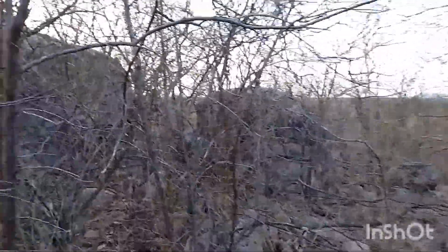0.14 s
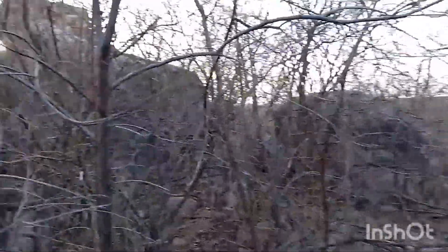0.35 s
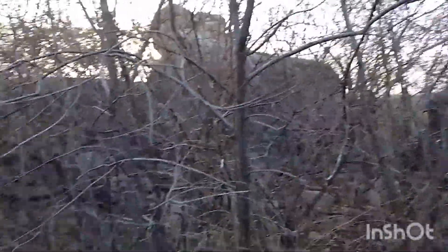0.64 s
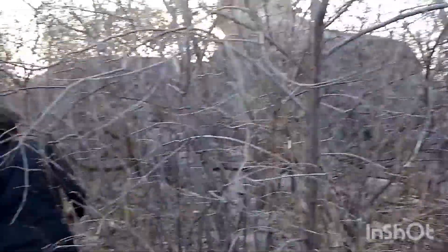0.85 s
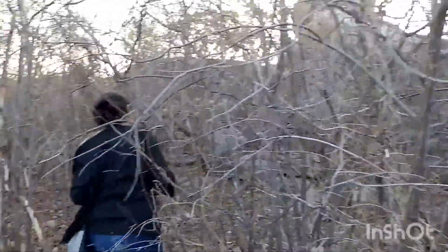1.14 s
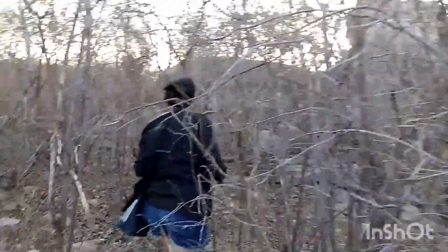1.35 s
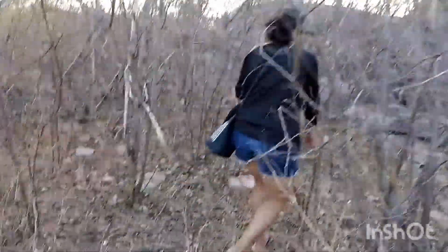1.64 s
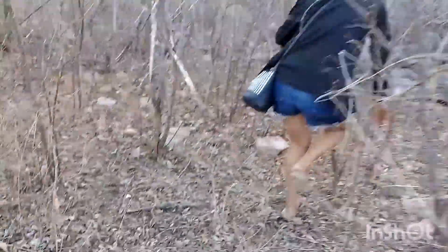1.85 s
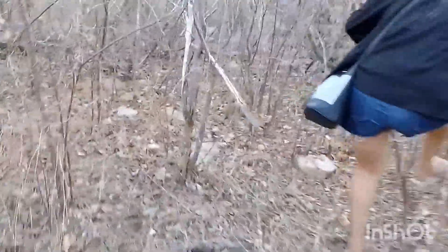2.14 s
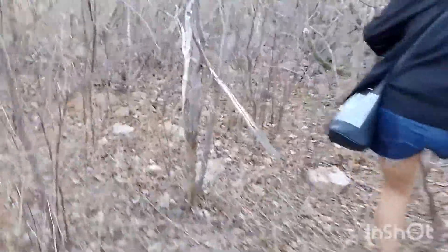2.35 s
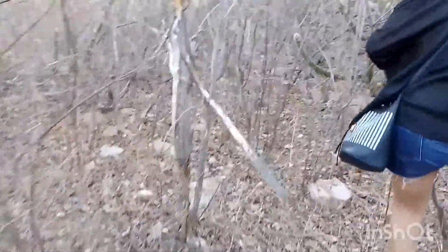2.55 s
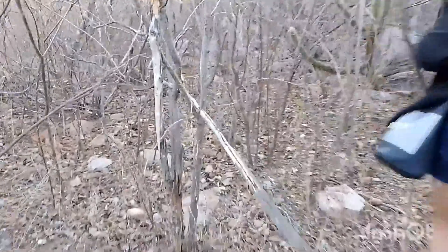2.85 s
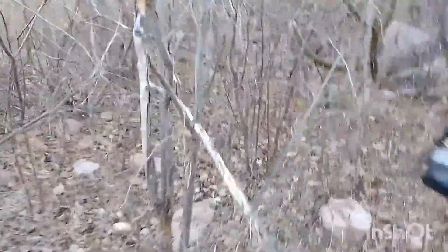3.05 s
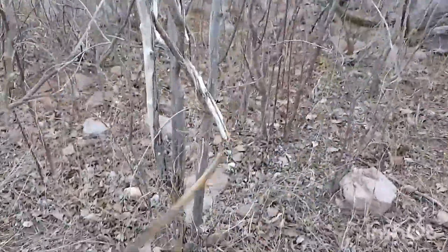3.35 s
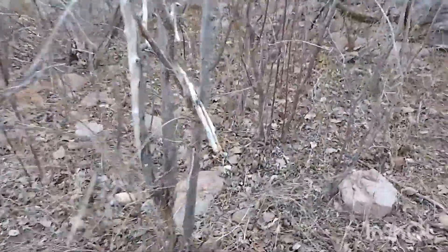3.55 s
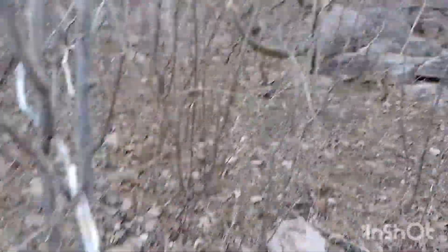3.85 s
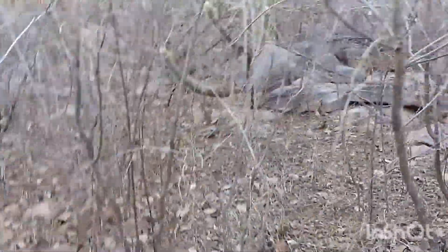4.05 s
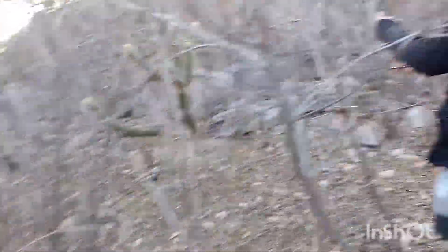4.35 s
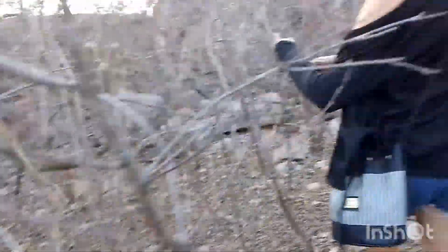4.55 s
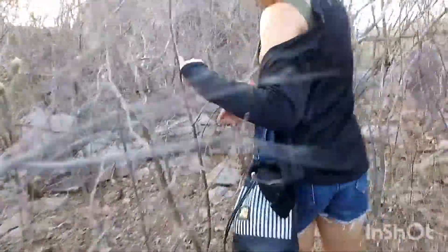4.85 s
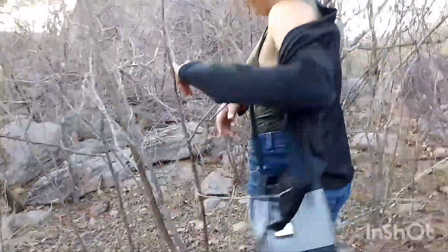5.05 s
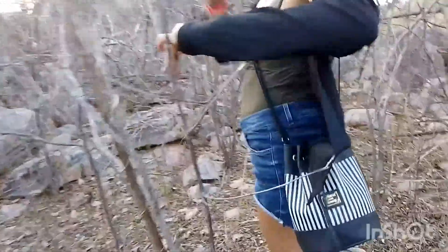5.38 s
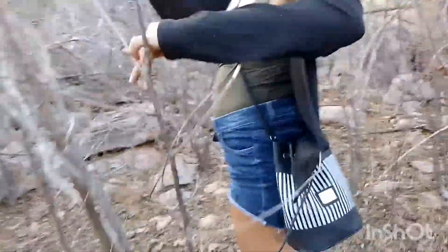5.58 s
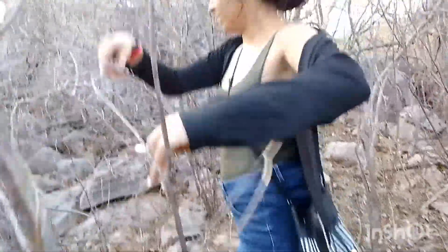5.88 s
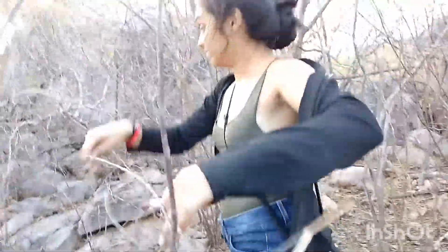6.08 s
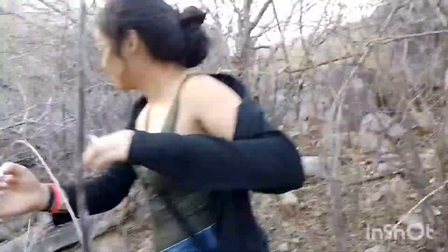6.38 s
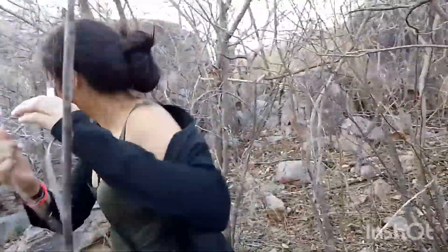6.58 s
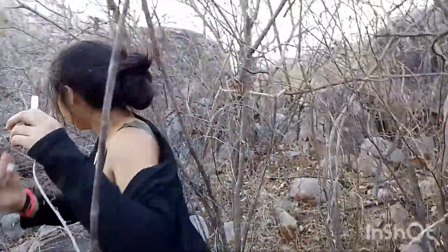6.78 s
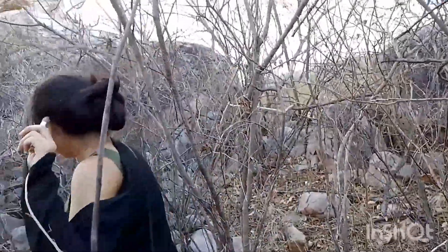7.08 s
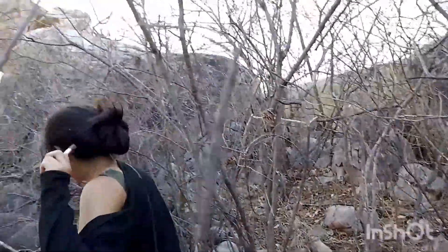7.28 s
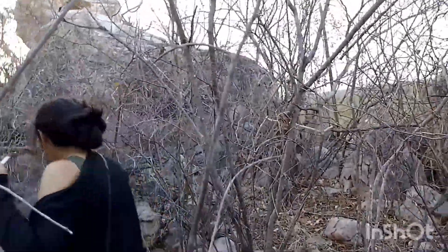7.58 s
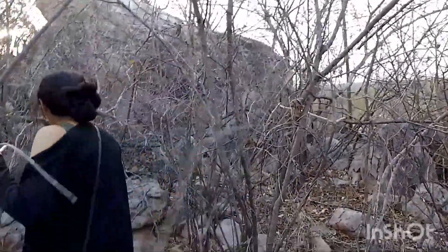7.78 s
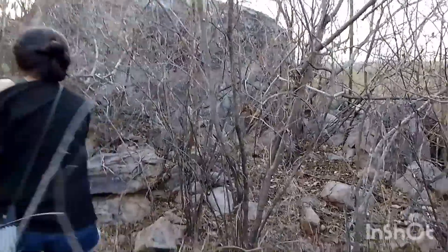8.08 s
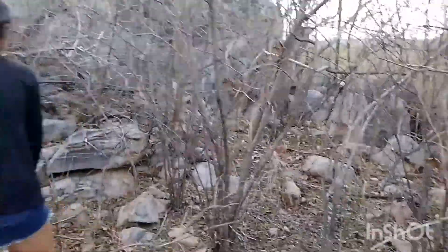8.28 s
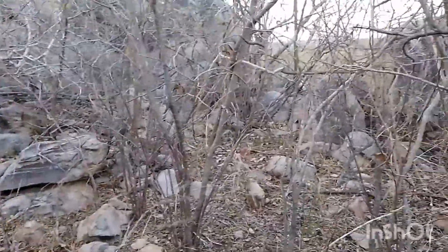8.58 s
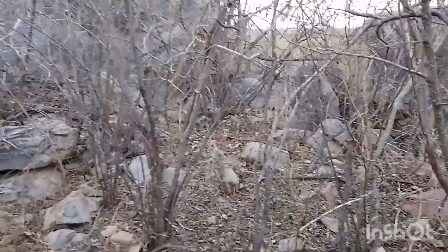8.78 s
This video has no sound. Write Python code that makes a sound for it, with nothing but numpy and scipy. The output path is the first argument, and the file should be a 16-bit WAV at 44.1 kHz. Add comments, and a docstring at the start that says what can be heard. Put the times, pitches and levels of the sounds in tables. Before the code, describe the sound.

Outdoors among bare stems and leaf litter, very close and dry, single microphone. Bright crispy rustling rises and falls with steps; thin twigs break with sharp ticks, thicker stems knock dully or rub with short airy scrapes. The strongest crack comes a little after three seconds, another dense run after five. Tiny metal jingles appear briefly in two places, and soft low handling rumble flutters under the movement.

```python
"""Walkers in dry scrub

Walkers push through leafless dry scrub, close to a handheld phone. Leaf litter and brush crackle in swells:
damped sine grains and patchy noise, coloured by layer. Twigs snap as noise bursts through resonances, stems
knock as rough damped notes and rub as noise through narrow bands; near 0.45-1.15 s a faint breath is drawn in
through the same narrow bands. Small metal pieces on a bag jingle in two short groups of decaying sines, and the
air rumbles faintly on the microphone as wavering low noise."""
import sys
import numpy as np
from scipy import signal
from scipy.fft import rfft, irfft, next_fast_len
from scipy.io import wavfile
from scipy.ndimage import uniform_filter1d, map_coordinates

SR = 44100
rng = np.random.default_rng(int(sys.argv[2]) if len(sys.argv) > 2 else 0)


def digitize_waveform(pressure):
    """Quantize a signal to 16-bit integers and store it at the path in sys.argv[1].

    Rows of a 2-D input are taken as channels; values are limited to [-1, 1].
    """
    field = np.atleast_2d(pressure).T
    bounded = np.clip(field, -1, 1)
    quanta = np.round(bounded * 32767).astype(np.int16)
    wavfile.write(sys.argv[1], SR, quanta)


def ratio_of_db(decibels):
    """Turn decibels (scalar or array-like) into linear amplitude factors; 0 dB maps to 1."""
    return 10 ** (np.asarray(decibels, float) / 20)


N = 393352

# wind and handling rumble at the microphone: (time [s], mean level [dB])
AIR_LEVEL = [(0, -94), (1.8, -99), (2.2, -92), (3.2, -89), (3.35, -76), (3.6, -80), (4.2, -76), (4.55, -87),
             (5.2, -89), (5.4, -77), (5.8, -84), (6.2, -75), (6.45, -83), (6.6, -75), (7, -97),
             (8.1, -97.5), (8.4, -75.5), (8.7, -87), (8.92, -94)]
# spectrum of that rumble: (frequency [Hz], density [dB per Hz])
AIR_COLOUR = [(15, -24.5), (25, -2), (55, -2.5), (110, -3.5), (150, -23), (250, -68.5)]
# narrow bands in which rubbed stems and the breath sing: (frequency [Hz], width [Hz])
NARROW_BANDS = [(300, 66), (930, 120), (1600, 170), (2250, 110), (2550, 100), (3350, 150), (4300, 300),
                (5500, 250), (6500, 350), (8800, 1200), (11500, 500), (12800, 150), (13650, 150)]
# stems rubbing past cloth and each other, and from 0.45 to 1.15 s (rows at 2400, 3400 and 5400 Hz) a faint #
# breath drawn in: (start [s], end [s], level before the swell [dB], pitch singing loudest [Hz], # strength of
# the other bands [dB])
NARROW_STROKES = [(0.17, 0.447, -60, 1620, -12.5), (.193, .508, -47.5, 8800, -9),
                  (.212, 0.903, -51.5, 11460, -14), (0, .2, -58, 5300, -6), (.45, .95, -61, 2400, -9),
                  (.6, 1.09, -61.5, 3400, -6), (.75, 1.15, -59, 5400, -15), (1.197, 1.433, -47, 9150, -25),
                  (2.028, 2.238, -45, 6360, -20), (2.197, 2.277, -57.5, 301, -20),
                  (2.682, 2.975, -42.5, 6040, -18), (4.45, 4.527, -46, 7100, -5.5),
                  (4.531, 4.605, -34.5, 6820, -21), (4.56, 4.777, -56, 1630, 2.5),
                  (4.62, 4.8, -41, 5000, -15), (4.64, 4.842, -54.5, 3190, -12),
                  (5.04, 5.183, -56, 1960, -7.5), (5.081, 5.2, -41.5, 13700, -1.5),
                  (5.309, 5.445, -49.5, 2570, -7), (5.995, 6.33, -38, 8400, -22), (6, 6.33, -45, 6540, -25),
                  (5.989, 6.33, -54, 1563, -18), (6.67, 6.755, -54, 1500, 1), (6.63, 6.78, -51, 4500, -3),
                  (6.8, 7, -50, 8600, -20), (7.448, 7.575, -39, 9670, -25)]
# resonances of the metal pieces: (frequency [Hz], level when shaken along [dB], 60 dB decay [s])
METAL_PIECES = [(3490, -29, .25), (4247, -22, .35), (4794, -10, 0.18), (5582, -31, 0.67),
                (5986, -60.5, 0.2), (6535, -23, .2), (7720, -16, 0.23), (8800, -14, 0.19), (10240, 0, 0.15),
                (11260, -38, 0.063), (12170, -6, .12), (13080, -17, .1), (13930, -30, .1),
                (14780, -14, 0.1)]
# metal contacts: (time [s], level [dB], pitch of the piece struck hardest [Hz], strength of the others [dB])
METAL_CONTACTS = [(2.329, -40, 10240, 3), (2.347, -27, 11260, -5), (2.355, -49, 4247, -6),
                  (2.425, -27, 11260, -3), (2.433, -21.5, 10240, -8), (2.44, -49, 3490, 8),
                  (2.47, -27, 11260, -8), (2.5, -43, 12170, -5), (2.53, -50, 4247, 3),
                  (2.54, -42, 5986, -10), (2.6, -42, 7720, -20), (4.605, -37, 7720, -25),
                  (4.64, -26, 7720, -25), (4.63, -35, 5582, -25), (5.0, -37, 7720, -25),
                  (5.05, -37, 7720, -25)]
# knocks of thicker stems and stones: (time [s], level before make-up gain [dB], pitch [Hz],
# 60 dB decay, at least 0.008 in use [s])
STEM_KNOCKS = [(.177, -48, 910, 0.011), (.505, -56.5, 588, .073), (1.962, -32, 4240, 0.0063),
               (2.02, -38.5, 574, .015), (2.0667, -41.5, 1070, .011), (2.3162, -46, 1060, .037),
               (2.9154, -34.5, 2150, .01), (2.929, -40, 1240, 0.032), (2.9301, -24.5, 2160, .012),
               (3.012, -37, 1260, .012), (3.1814, -43.5, 603, .04), (3.3435, -15.5, 776, 0.016),
               (3.3443, -8, 3220, 0.012), (3.3594, -12, 4200, .017), (3.3641, -22.5, 328, .014),
               (3.6053, -29, 3300, .011), (3.645, -40, 935, .023), (3.6465, -30, 3840, .012),
               (5.0732, -44.5, 326, 0.04), (5.348, -41.5, 630, .027), (5.3948, -41.5, 973, .04),
               (5.641, -33, 510, 0.012), (6.4488, -38, 2230, .0095), (6.5047, -37.5, 2750, .012),
               (6.5486, -41, 2960, .011), (6.58, -39, 324, 0.014), (6.6222, -31, 3470, .012),
               (7.4393, -42, 2000, 0.01), (8.1053, -49, 1090, 0.031)]
# spectra of leaves, thin tips, twigs and ground: (frequency [Hz], density [dB per Hz])
LEAF_COLOUR = [(3200, -79), (4500, -17), (6000, 1.5), (8000, 3.5), (9500, 5), (10500, -5.5), (12000, -22.5)]
TIPS_COLOUR = [(8500, -48), (9800, -13), (10800, -9.5), (13000, -3.5), (15300, -4), (15700, -21.5),
               (16600, -59)]
TWIG_COLOUR = [(900, -20.5), (1300, -17), (1700, -6.5), (2600, -4.5), (3500, -2.5), (4400, -0.5),
               (5500, -13)]
SOIL_COLOUR = [(120, -23), (190, -11), (280, 2.5), (500, 0), (800, 1), (1250, -4.5), (1700, -2)]
# steps and pushes through the brush, before trim and flutter: (peak time [s], rise [s per 20 dB],
# fall [s per 20 dB], leaf hiss [dB], thin tips over it [dB], twig scrape over it [dB])
BRUSH_PUSHES = [(0, .1, 0.3, -55, -1.5, -2), (.26, .1, .27, -45, -2.5, -6.5),
                (.46, 0.2, .5, -48, -3.5, -11.5), (.65, 0.14, 0.39, -43, -2.5, -2.5),
                (1.33, 0.26, .2, -47, 0, -12.5), (1.55, 0.1, .9, -57, 0, -11.5),
                (1.95, 0.04, 0.054, -25.5, -4, -4.5), (2.08, 0.08, 0.09, -31, -6.5, -13),
                (2.14, 0.12, .35, -43, -6, -11.5), (2.315, .025, .15, -37, -10, -27),
                (2.435, .03, .3, -40, -5, -30), (2.715, .06, .6, -36, -18, -12),
                (2.91, .35, 0.3, -34, -8, -7), (3.09, 0, 0.4, -41, -10, -9),
                (3.19, 0.1, 0.26, -35, -12, -17), (3.348, .01, 0.0417, -13, -13.5, -12),
                (3.43, 0.06, 0.21, -27, -5.5, -10.5), (3.65, 0.29, 0.22, -31, 1, -10),
                (3.8, 0.24, 0.55, -39, 0, -8), (3.97, 0.5, .19, -40, -1.5, -14.5),
                (4.48, 0.11, 0.1, -40, -8, -17), (4.57, 0.07, 0.33, -31, -13, -17.5),
                (4.68, 0.23, 0.44, -28, -3.5, -19), (4.9, .3, .18, -38, -4, -24),
                (5.11, .12, .4, -36, -6, -21), (5.2, .06, .55, -26, -3.5, -25),
                (5.4, 0.19, .18, -27, -5, -13.5), (5.48, .15, 0.29, -28, 5, -9.5),
                (5.58, .25, 0.4, -27, -2, -9), (6.07, .05, .12, -29, -21, -15.5),
                (6.2, 0.26, .5, -39, -13, -21), (6.36, .05, 0.15, -35, -1.5, -17),
                (6.5, .07, .1, -38, -3, -10.5), (6.6, 0.02, .12, -32, 3, -13),
                (6.7, .09, .09, -29, -2, -18.5), (6.81, .2, 0.43, -46, -1.5, -15.5),
                (7.28, .02, .1, -52, -3, -9), (7.35, 0.16, 0.14, -48, -10.5, -17),
                (7.44, 0.08, .2, -48, 2, -6.5), (7.54, 0.27, 0.12, -50, 6, -12),
                (7.69, .04, .25, -52, -5, -11), (7.81, .02, .6, -53, -7, -12),
                (8.01, .1, .6, -46, -1.5, -14.5), (8.16, 0.35, 0.46, -47, -1.5, -18.5),
                (8.3, 0.36, .45, -42, 3, -18), (8.404, .025, .4, -31, .5, -17.5),
                (8.61, 0.3, .2, -43, 0.5, -21), (8.881, .11, 0.2, -45, 3.5, -9)]
# between the pushes, before trim and flutter: (leaf hiss [dB], thin tips [dB], twig scrape [dB])
QUIET_LEVELS = [-61, -64, -70]
# low rustle of the ground between steps, before trim and flutter: (time [s], level [dB])
GROUND_LEVEL = [(0, -77), (.6, -72.5), (1, -76), (1.85, -75), (2.05, -64), (2.6, -72), (2.75, -59),
                (3.25, -61.5), (3.5, -56.5), (3.95, -57), (4.15, -68.5), (5, -71.5), (5.3, -60.5),
                (5.9, -67), (6.9, -70), (7.9, -68), (8.92, -69.5)]
# the clearest snapping twigs: (time [s], crack level before make-up gain [dB], ring pitch [Hz],
# 60 dB decay, at least 0.003 in use [s], wood level relative to the crack before its trim [dB])
CLEAR_SNAPS = [(.0872, -34, 5580, .041, -31), (.236, -25, 8800, .012, -17), (.3293, -29, 8600, .012, -36),
               (.48, -30, 10500, .01, -30), (.5552, -30, 6900, .014, -29), (.637, -15, 6750, .015, -18),
               (.7727, -28, 11670, .01, -19), (.84, -33, 9000, .015, -20), (1.5345, -34, 9420, .003, -21),
               (1.8966, -22, 10790, .0079, -21), (1.9277, -18.5, 6550, .012, -24),
               (1.9426, -18, 13700, .03, -35), (1.9599, -13.5, 3900, 0.014, -5),
               (1.9954, -23, 5770, .01, -16), (2.1546, -19, 6550, .018, -23.5),
               (2.3002, -16, 8600, .018, -45), (2.3138, -18, 6500, .022, -42),
               (2.3256, -14, 8850, .0037, -42), (2.3456, -21, 9400, .01, -40),
               (2.3534, -21.5, 8800, .024, -40), (2.66, -10.5, 5900, .0068, -32),
               (2.71, -23, 9650, .059, -21), (2.7747, -20, 6340, .0092, -25),
               (2.9057, -18.5, 8900, .018, -6), (3.0117, -6, 8030, .003, -17.5),
               (3.0778, -17.5, 8860, .017, -22), (3.1444, -26, 12000, .012, -29),
               (3.1686, -17.5, 6630, .029, -23), (3.1955, -21, 6330, .059, -27),
               (3.231, -23, 6130, .02, -39), (3.2646, -27, 8000, .03, -33), (3.28, -23.5, 9120, .016, -30),
               (3.3449, -7.5, 9000, .018, -17.5), (3.3592, -1, 7240, .04, -21.5),
               (3.4186, -14.5, 8500, .025, -17.5), (3.4437, -15.5, 10830, .029, -19),
               (3.4546, -14, 6800, 0.0079, -37), (3.483, -14.5, 10100, .0042, -34),
               (3.509, -17.5, 9150, .017, -28.5), (3.5886, -5.5, 9440, .013, -19.5),
               (3.6424, -8.5, 11730, .015, -14), (3.902, -24, 6000, .012, -18),
               (3.9767, -14, 13400, .01, -43), (4.0245, -26, 7720, .011, -33),
               (4.0688, -26, 13500, .027, -35), (4.408, -23, 5600, .012, -21),
               (4.5347, -25, 9500, .0063, -32), (5.0181, -26, 7950, .009, -19),
               (5.1096, -14, 8530, .026, -23.5), (5.1855, -17.5, 8760, .028, -28),
               (5.2157, -17, 8200, .013, -27), (5.298, -16, 10140, .0068, -29),
               (5.3274, -7.5, 13170, .012, -32), (5.3404, -10, 7350, .009, -40),
               (5.478, -6, 5520, .011, -24), (5.5544, -10.5, 14340, .008, -9),
               (5.5938, -5, 10800, 0.0054, -16), (5.603, -10, 10700, .012, -28),
               (5.6224, -6.5, 14500, .019, -21), (5.8498, -20.5, 14050, 0.0088, -30),
               (5.924, -27.5, 8380, .013, -35), (6.0, -27, 9000, .02, -20), (6.1226, -22, 7700, .018, -25),
               (6.2092, -19.5, 9590, .003, -27), (6.3446, -8, 13900, .015, -26),
               (6.3855, -22, 13510, .012, -31), (6.4139, -22, 8800, .013, -34),
               (6.5795, -8.5, 9000, .015, -17.5), (6.6155, -7.5, 10960, .0048, -30.5),
               (6.6224, -14.5, 10400, .018, -17), (6.802, -25.5, 9100, .026, -34),
               (6.837, -27, 8930, .007, -33), (6.8575, -26, 9030, .023, -30),
               (6.928, -31, 11230, .012, -24), (7.188, -20, 13000, .012, -35),
               (7.209, -24, 12500, .012, -42), (7.277, -39, 9000, .012, -20),
               (7.3239, -30, 10980, .018, -37), (7.3496, -21.5, 8000, .015, -29),
               (7.432, -13.5, 10450, .0049, -23.5), (7.516, -16, 9400, .003, -41),
               (7.7998, -31.5, 6200, 0.025, -22), (7.848, -32.5, 7700, .014, -28),
               (7.937, -32, 9000, .025, -25), (7.9834, -24.5, 7720, .003, -19),
               (8.0233, -18.5, 10300, 0.0041, -37), (8.273, -17.5, 8850, .025, -18.5),
               (8.3232, -14, 8200, 0.0065, -47), (8.3988, -12.5, 7200, .022, -19),
               (8.4214, -14.5, 7840, .0067, -18.5), (8.576, -24, 6200, .015, -30)]


def unit(x):
    """Scaled to rms 1."""
    return x / np.sqrt(np.mean(x ** 2) + 1e-20)


def peak_one(x):
    """Scaled to peak 1."""
    return x / np.max(np.abs(x))


def curves(rows):
    """One value per sample for each column after the time."""
    time, *columns = np.transpose(rows)
    return [np.interp(np.arange(N) / SR, time, column) for column in columns]


def wobble(rate):
    """A smooth random curve, rate knots a second."""
    knots = rng.standard_normal(int(N * rate / SR) + 4)
    return map_coordinates(knots, [np.arange(N) * rate / SR])


def coloured(x, points):
    """x through a (Hz, dB) spectrum read on a log axis, rms 1."""
    m = next_fast_len(N + 8192)
    hz, db = np.transpose(points)
    log_bins = np.log(np.fft.rfftfreq(m, 1 / SR) + 1)
    gain = ratio_of_db(np.interp(log_bins, np.log(hz), db, left=-120, right=-120))
    return unit(irfft(rfft(x, m) * gain, m)[:N])


def resonance(f, hz, width_hz):
    """Complex response of a damped resonator, 1 at its pitch."""
    return 1j * f * width_hz / (hz * hz - f * f + 1j * f * width_hz)


def air():
    """Light wind and handling rumble: low noise on the microphone, its level wavering in dB."""
    level_db = curves(AIR_LEVEL)[0] + 2.8 * wobble(9) + 2.7 * wobble(30)
    return ratio_of_db(level_db) * coloured(rng.standard_normal(N), AIR_COLOUR)


def thicket(x):
    """Stems and rocks nearby scatter a short diffuse echo: decaying noise convolved with the sound."""
    t = np.arange(SR // 8) / SR
    tail = rng.standard_normal(len(t)) * ratio_of_db(-60 * t / 0.035) * (t > .002)
    return signal.fftconvolve(x, tail / np.linalg.norm(tail))[:N]


def rubs_and_breath():
    """Uneven slips of a stem, or the breath, drive the narrow resonances, one of them most, swelling and fading
    over the stroke."""
    out = np.zeros(N)
    fade_db_per_octave = 10  # bands far from the loudest one sing more weakly
    for start, end, db, loudest_hz, along_db in NARROW_STROKES:
        n = round((end - start) * SR)
        hz, width_hz = np.transpose(NARROW_BANDS)[:, :, None]
        loudest = np.arange(len(hz))[:, None] == np.argmin(abs(hz - loudest_hz))
        others_db = along_db - fade_db_per_octave * abs(np.log2(hz / loudest_hz))
        level_db = np.where(loudest, 0, others_db + rng.normal(0, 2.96, hz.shape))
        hz = np.where(loudest, loudest_hz, hz)
        unevenness = unit(uniform_filter1d(rng.standard_normal(SR), size=200))[:n]
        slips = rng.standard_normal(n) * ratio_of_db(4 * unevenness)
        f = np.fft.rfftfreq(n, 1 / SR)
        # the resonance twice, up to a constant sign
        response = (f * width_hz / (hz * hz - f * f + 1j * f * width_hz)) ** 2
        bands = irfft(rfft(slips) * response, n)
        sung = sum(ratio_of_db(gain_db) * unit(band) for gain_db, band in zip(level_db, bands))
        swell = np.sin(np.pi * np.arange(n) / n) ** 0.45
        out[round(start * SR):][:n] += ratio_of_db(db) * sung * swell
    return out


def jingle():
    """Each contact rings the piece struck hardest; the other pieces shake along at their own levels."""
    out, t = np.zeros(N + SR), np.arange(SR // 2) / SR
    hz, level_db, t60 = np.transpose(METAL_PIECES)[:, :, None]
    for s, db, struck_hz, along_db in METAL_CONTACTS:
        struck = np.arange(len(hz))[:, None] == np.argmin(abs(hz - struck_hz))
        others_db = level_db + along_db + rng.normal(0, 5.3, hz.shape)
        gain_db = db + np.where(struck, 0, others_db)
        # the contact itself: a tick of bright noise
        tick = ratio_of_db(db - 11.5 - 60 * t / 0.0084) * np.diff(rng.standard_normal(len(t) + 1))
        ring = ratio_of_db(gain_db - 60 * t / t60) * np.sin(2 * np.pi * (hz * t + rng.random(hz.shape)))
        onset = 1 - np.exp(-t / .003)
        out[round(s * SR):][:len(t)] += ring.sum(axis=0) * onset + tick
    return out[:N]


def knocks():
    """A dull blow: one damped note with a rough edge."""
    out, t = np.zeros(N + SR), np.arange(SR // 8) / SR
    for s, db, hz, t60 in STEM_KNOCKS:
        # noise held to one value in 24 samples; the difference takes the bass out
        slow = uniform_filter1d(rng.standard_normal(len(t) + 24), size=24)[::24]
        rough = np.diff(slow)
        rough = 1.13 * np.interp(np.arange(len(t)) / 24, np.arange(len(rough)), rough)
        note = (np.cos(2 * np.pi * hz * t) + rough) * ratio_of_db(-60 * t / max(t60, .008))
        onset = 1 - np.exp(-t / 0.00041)
        out[round((s - .002) * SR):][:len(t)] += ratio_of_db(db + 2.5) * note * onset
    return out[:N]


def patchy(depth_db, streak_db):
    """Noise whose strength varies in short patches and in narrow streaks, as rubbed stems ring for a while."""
    z = signal.stft(rng.standard_normal(N), nperseg=256)[2]

    def field(bins, frames):
        """Random map smoothed over bins of pitch and frames of time, rms 1."""
        smooth = uniform_filter1d(rng.standard_normal(z.shape), bins, axis=0)
        return unit(uniform_filter1d(smooth, frames, axis=1))

    gain_db = depth_db * field(4, 12) + streak_db * field(1, 60)
    return unit(signal.istft(z * ratio_of_db(gain_db), nperseg=256)[1][:N])


def crackle(mid_hz, octaves, cycles, spread_db, count):
    """Tiny breaks: damped sines of random pitch, most of them weak, a few strong."""
    start = (rng.random((count, 1)) * N).astype(int)
    size = np.minimum(rng.exponential(1, count), 4)
    hz = mid_hz * 2 ** (octaves * rng.standard_normal(count))
    hz = np.clip(hz, 300, .36 * SR)[:, None]
    k = np.arange(128)
    turns = hz * k / SR
    grain = ratio_of_db(spread_db * size)[:, None] * np.exp(-turns / cycles) * np.sin(2 * np.pi * turns)
    at = start + k
    return unit(np.bincount(at.ravel(), grain.ravel(), N + len(k))[:N])


def rustle_db():
    """Levels of leaves, tips, twigs and soil: each push rises and falls evenly in dB, and their powers add."""
    t = np.arange(0, N, 64) / SR
    soil_under_twig_db = 17  # the ground answers each push this far below the twigs
    peak_s, rise, fall, leaf_db, tips_db, twig_db = np.transpose(BRUSH_PUSHES)[:, :, None]
    swell_db = leaf_db - 20 * np.where(t < peak_s, (peak_s - t) / rise, (t - peak_s) / fall)
    overs = [0, tips_db, twig_db, twig_db - soil_under_twig_db]
    quiet = [*QUIET_LEVELS, np.interp(t, *np.transpose(GROUND_LEVEL))]
    levels = []
    for over_db, quiet_db in zip(overs, quiet):
        power = np.sum(ratio_of_db(swell_db + over_db) ** 2, axis=0) + ratio_of_db(quiet_db) ** 2
        levels.append(np.interp(np.arange(N) / SR, t, 10 * np.log10(power)))
    return levels


def brush():
    """Breaks and rubbing excite leaves, tips, twigs and soil together; the louder the leaves, the more flutter."""
    levels = rustle_db()
    breaks = crackle(mid_hz=8000, octaves=0.66, cycles=1.14, spread_db=5.0, count=16000)
    # thicker twigs
    breaks += 0.83 * crackle(mid_hz=2193, octaves=0.845, cycles=3.5, spread_db=3.5, count=5000)
    rubbing = patchy(depth_db=2.5, streak_db=3.0)
    busy = np.clip((levels[0] + 67) / 18, .15, 1)
    flutter_db = busy * (1.2 * wobble(30) + 1.8 * wobble(90))
    trim_db = -1.6
    shares = [0.39, 0.51, 0.3, 0.14]  # weight of separate breaks against rubbing in each layer
    colours = [LEAF_COLOUR, TIPS_COLOUR, TWIG_COLOUR, SOIL_COLOUR]
    out = np.zeros(N)
    for level_db, share, colour in zip(levels, shares, colours):
        layer = unit(share * coloured(breaks, colour) + (1 - share) * coloured(rubbing, colour))
        out += ratio_of_db(level_db + flutter_db + trim_db) * layer
    return out


def small_snaps():
    """Lesser twigs break at random, more often and louder where the brush is busy; rows as for clear snaps."""
    count = 30
    leaf_db, draw = rustle_db()[0], rng.standard_normal((count, 4))
    chance = np.cumsum(ratio_of_db(leaf_db / 3))
    at = np.searchsorted(chance, rng.uniform(.01, .99, count) * chance[-1])
    level_db = leaf_db[at] + 7 + 3 * draw[:, 0]
    hz = np.minimum(9300 * 2 ** (.3 * draw[:, 1]), 15000)
    t60_s = .012 * 2 ** (.8 * draw[:, 2])
    wood_db = -26.5 + 6 * draw[:, 3]
    return np.transpose([at / SR, level_db, hz, t60_s, wood_db])


def snaps():
    """Fibres tear for a moment, then one sharp break and its splinters ring near a pitch; the wood answers."""
    out, t = np.zeros(N + SR), np.arange(-256, 1792) / SR
    f = np.fft.rfftfreq(len(t), 1 / SR)
    for s, db, hz, t60, wood_db in [*CLEAR_SNAPS, *small_snaps()]:
        # tearing rises 60 dB in 6 ms, splinters decay after the break at t = 0
        shape = ratio_of_db(-60 * np.where(t < 0, -t / .006, t / max(t60, .003)))
        noise = rng.standard_normal((2, len(t))) * shape + 3.0 * (t == 0)
        wood_hz = 2400 * 2 ** rng.normal(0, .3)
        splinters = resonance(f, hz, 0.089 * hz) + 0.27 * resonance(f, 8800, 9000)
        crack = irfft(rfft(noise[0]) * splinters * resonance(f, 8750, 8700))
        wood = irfft(rfft(noise[1]) * resonance(f, wood_hz, 1530) ** 2)
        snap = peak_one(crack) + ratio_of_db(wood_db - 3.5) * peak_one(wood)
        out[round((s + t[0]) * SR):][:len(t)] += ratio_of_db(db + 3.0) * snap
    return out[:N]


def scene():
    """All sources, one channel; the microphone port cuts the bass of airborne sound, not of wind on the port."""
    near = snaps() + knocks() + jingle()
    airborne = near + ratio_of_db(-7) * thicket(near) + brush() + rubs_and_breath()
    bass_cut = signal.butter(3, 170, "high", fs=SR, output="sos")
    return (signal.sosfilt(bass_cut, airborne) + air())[None]


def band_limit(x):
    """A steep low-pass at the top of the band."""
    return signal.sosfilt(signal.butter(12, 16630, fs=SR, output="sos"), x)


def record(dry):
    """The phone rounds off the loudest peaks and keeps little above its band limit."""
    top_hz = 15600
    soft = dry / (1 + np.abs(dry / .85) ** 4) ** (1 / 4)
    keep = np.where(np.fft.rfftfreq(N, 1 / SR) < top_hz, 1, ratio_of_db(-38))
    mix = irfft(rfft(soft) * keep, N)
    return band_limit(mix)


dry = scene()
out = record(dry)
digitize_waveform(out)
```